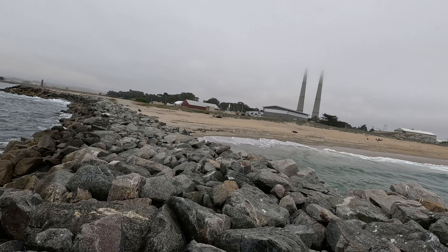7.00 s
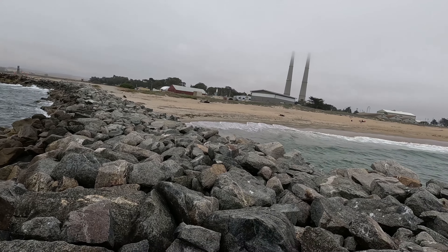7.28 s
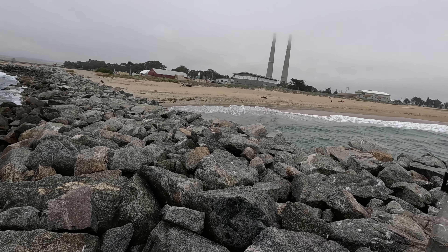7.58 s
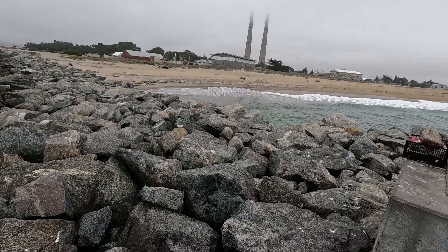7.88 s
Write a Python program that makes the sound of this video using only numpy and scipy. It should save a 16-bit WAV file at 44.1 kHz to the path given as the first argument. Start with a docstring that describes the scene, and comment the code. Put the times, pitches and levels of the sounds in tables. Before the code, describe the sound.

Surf washes over a rock jetty while wind rumbles and thumps on the microphone. A close foghorn sounds a loud, steady, slightly buzzy tone for two seconds, pauses for two, then repeats it on the same pitch. The tone flutters roughly at times. The sea drops back under each blast and swells up again afterwards, with a bigger wave at the end.

```python
"""Foghorn on a rock jetty

Two close 2 s blasts: a driven diaphragm starts flat and catches its pitch; the flare rings.
The tone is heard fluttering and stuttering at times.
Surf washes the rocks and roars in their gaps; wind eddies rumble and thump on the microphone.
Gain control pushes the sea down under each blast and lets it swell back afterwards."""
import sys
import numpy as np
from scipy import signal
from scipy.fft import rfft, irfft, next_fast_len
from scipy.io import wavfile
from scipy.ndimage import uniform_filter1d

SR = 44100
rng = np.random.default_rng(int(sys.argv[2]) if len(sys.argv) > 2 else 0)


def unload_wav(signal):
    """Save mono or channel-first audio to the path in sys.argv[1] as 16-bit WAV at rate SR, clipped to [-1, 1]."""
    wavfile.write(
        sys.argv[1],
        SR,
        np.round(np.clip(np.atleast_2d(signal).T, -1, 1) * 32767).astype(np.int16),
    )


N = 354123
TIME = np.arange(N) / SR
HORN_HZ = 406.8

# wind spectrum: f/Hz, gain/dB
WIND_SPECTRUM = [(5, -24.5), (16, -2), (45, 2), (70, -1), (110, -3.5), (180, -8.5), (260, -18.5),
                 (420, -27.5), (800, -39), (2000, -81), (6000, -125)]
# gusts: peak t/s, length/s, level/dB
WIND_GUSTS = [(.15, 0.97, -29), (.85, 2.3, -22.5), (1.55, 0.23, -38), (1.78, 0.48, -16), (2.3, 1.6, -23.5),
              (3.3, 2.1, -28), (4.28, 0.37, -36), (4.5, 0.18, -31.5), (4.81, 0.2, -24), (5.03, 0.46, -23),
              (5.77, 0.37, -24), (6.5, 0.26, -28.5), (7.12, 0.79, -17), (7.6, 0.7, -16), (7.97, 0.42, -24)]
# buffet rumble spectrum: f/Hz, gain/dB
BUFFET_SPECTRUM = [(30, -5), (90, -4), (150, 2.5), (230, -4), (350, -6.5), (600, -27), (1500, -56.5),
                   (5000, -120)]
# large eddies: peak t/s, length/s, rumble/dB, push/dB
WIND_BUFFETS = [(0.266, 0.046, -19.5, -21), (0.734, 0.05, -19.5, -22), (0.833, 0.026, -23.5, -10),
                (1.006, 0.017, -20, -16), (1.049, 0.013, -17.5, -16), (1.131, .018, -20.5, -15),
                (1.158, .014, -19, -20), (1.239, .06, -23, -20), (1.306, 0.022, -22, -16),
                (1.708, .096, -17.5, -19), (1.863, .059, -17, -18), (1.994, .04, -17, -14),
                (2.389, 0.04, -15.5, -27), (4.81, 0.05, -38, -8.5), (4.982, .035, -33, -13),
                (5.025, 0.052, -31, -16), (5.085, 0.022, -28, -22), (5.598, 0.029, -25, -28),
                (7.049, .087, -21, -18), (7.237, 0.037, -17.5, -11), (7.573, .03, -13.5, -20)]
# calm sea spectrum: f/Hz, gain/dB
SURF_SPECTRUM = [(60, -8), (200, -1), (420, -3.5), (700, -3.5), (1000, -7), (1400, -10), (2000, -14.5),
                 (2600, -18), (3500, -20.5), (4200, -25.5), (5600, -31.5), (7500, -33.5), (9000, -44),
                 (11000, -52), (14000, -70)]
# swells of the wash and its low rumble: peak t/s, length/s, swell/dB, rumble change/dB
SURF_SWELLS = [(0.704, 2.36, 4.5, -5.5), (1.42, 0.42, 2, -14), (1.898, 1.04, 3.5, -1),
               (3.75, 0.3, 2.5, 1.5), (4.34, 0.47, 1.2, 1.5), (4.857, 1.85, 0.8, -7.5),
               (5.38, 0.68, 0.5, 4), (6.099, 1.8, 0.5, 12), (6.9, 1.4, 5.5, 4), (7.768, 1.53, 9, 4)]
# foam on the rocks: peak t/s, length/s, extra treble/dB
FOAM_SPLASHES = [(.1, 0.74, 3), (0.817, 0.21, 1.5), (1.397, 0.42, 5), (2.203, .25, 5), (2.85, 1.9, 3.5),
                 (4.684, 0.67, 1), (5.3, 0.74, 0), (6.3, 0.6, 2.5), (6.756, .36, 3), (7.249, 0.46, 1.5)]
# water roaring in rock gaps: peak t/s, length/s, centre f/Hz, boost/dB
GAP_ROARS = [(3.947, .4, 700, 3.5), (4.5, 1, 600, 2), (4.92, .3, 680, 3), (5.19, .14, 860, 6),
             (5.4, 0.25, 850, 3), (5.95, .6, 600, 2)]
# high hiss spectrum: f/Hz, gain/dB
HISS_SPECTRUM = [(7000, -38.5), (10000, 3), (12700, -0.5), (15000, -1.5), (16000, -16.5)]
# high hiss envelope: t/s, level/dB
HISS_ENVELOPE = [(6.0, -94), (6.3, -74.5), (6.75, -66.5), (7.4, -69), (7.6, -87.5), (7.9, -95.5)]
# flutter band at the fundamental: f/Hz, gain/dB
LOW_FLUTTER_SPECTRUM = [(250, -59), (310, -19), (335, 3.5), (365, 1), (405, 0.5), (450, -5.5), (505, -8.5),
                        (560, -26.5), (680, -68), (3000, -120)]
# flutter band at the octave: f/Hz, gain/dB
OCTAVE_FLUTTER_SPECTRUM = [(620, -48.5), (720, -9.5), (790, 3.5), (835, 4), (880, -10), (930, -31),
                           (1000, -61.5), (3000, -120)]
# stronger flutter: peak t/s, length/s, level at fundamental/dB, level at octave/dB
FLUTTER_SPELLS = [(1.784, 0.75, -22, -29), (2.274, 0.21, -24, -46), (3.478, 0.56, -20, -36.5),
                  (3.627, 0.047, -12.5, -15), (6.982, 0.17, -19, -44), (7.31, 0.087, -18.5, -37),
                  (7.544, 0.26, -14, -20.5), (7.643, 0.17, -11, -18.5), (7.843, 0.52, -25.5, -47.5)]
# flare ringing as the note catches or cuts out: t/s, level/dB
FLARE_ONSETS = [(1.627, -24), (3.628, -29), (5.628, -30.5)]
# brief dips and swells heard in the tone: t/s, length/s, harmonic, offset/Hz, strength (<0 dip)
TONE_STUTTERS = [(1.633, 0.012, 2, -66.5, -1.5), (1.643, 0.023, 1, -30, -1.5), (1.662, 0.053, 1, 6, .5),
                 (1.745, 0.046, 4, 18, -1), (1.876, 0.03, 2, 40, -0.4), (1.925, 0.035, 2, 27, -0.33),
                 (2.49, 0.035, 2, 42, -0.3), (3.228, .03, 2, 48, 0.16), (3.337, 0.033, 1, -26, -0.34),
                 (3.371, .028, 2, 50, -0.3), (3.425, 0.042, 1, 47, 0.2), (3.486, 0.036, 2, 52, -.38),
                 (3.523, 0.046, 2, 58, 0.26), (3.611, 0.012, 2, -62, -0.6), (3.627, 0.051, 1, 35, 0.8),
                 (5.627, 0.061, 1, -14, 0.33), (5.634, 0.013, 2, -48, -1), (5.642, 0.033, 1, -34, -0.9),
                 (1.88, .03, 4, -40, 0.3), (1.94, .035, 4, -40, 0.4), (2.11, .04, 10, -25, -1),
                 (2.865, .035, 10, -25, -.9), (2.92, .035, 10, -25, -2), (3.632, .05, 4, -10, 3),
                 (6.09, 0.051, 4, -18, -1.8), (6.25, .035, 4, -18, 0.3), (7.387, 0.037, 1, 65, 0.6),
                 (7.451, 0.064, 1, -47, 1.36), (7.456, 0.037, 2, -55, -0.7), (7.488, .04, 2, -45, 0.16),
                 (7.513, 0.02, 1, 55, 0.7), (7.536, 0.066, 1, -48, 1.54), (7.615, 0.026, 1, -22, 0.7),
                 (7.574, 0.04, 2, -47, .25), (7.625, 0.044, 1, -51, 0), (7.639, 0.061, 2, -30, 2.5),
                 (7.645, 0.041, 1, -48, 1.2)]
# blasts: start/s, end/s, low overtone slope/(dB/s), high overtone slope/(dB/s), steady flutter/dB
HORN_BLASTS = [(1.603, 3.619, -2.5, -3, -25), (5.604, 7.612, -0.5, -0.5, -44)]
# main partials, blast 1: t/s, fundamental/dB, octave/dB, double octave/dB
FIRST_PARTIALS = [(1.8, -9, -5.5, -28), (2.08, -16, -5, -30), (2.3, -12.5, -5, -28), (2.62, -8.5, -7, -32),
                  (3.25, -10.5, -5, -36.5), (3.55, -9, -5, -32)]
# main partials, blast 2: t/s, fundamental/dB, octave/dB, double octave/dB
SECOND_PARTIALS = [(5.7, -3, -4, -32), (6.12, -7, -4.5, -31.5), (6.6, -5, -6, -32.5),
                   (7.15, -5.5, -7.5, -41.5), (7.56, -8, -6, -54)]
# buzz at mid-blast: harmonic, level in blast 1/dB, level in blast 2/dB
BUZZ_OVERTONES = [(3, -33.5, -36.5), (5, -41, -49), (6, -47.5, -62.5), (7, -58, -65), (8, -52.5, -48.5),
                  (9, -48.5, -45), (10, -43.5, -50.5), (11, -55.5, -59.5), (12, -58, -66.5), (13, -60, -64),
                  (14, -63.5, -67)]
# overtones swelling or fading in moving air: peak t/s, length/s, harmonic, change/dB
AIR_FADES = [(1.85, .8, 3, 1.5), (2.95, 0.96, 3, -2), (3.42, .4, 3, 0.5), (5.75, 0.46, 3, 1.5),
             (2.35, .4, 5, 2), (2.92, .7, 5, -2.5), (3.55, .5, 5, 3), (5.78, .5, 5, 5), (6.7, 1.3, 5, -2),
             (7.58, .24, 5, 15.5), (1.68, .5, 6, -4.5), (2.872, .3, 6, 0), (3.475, .55, 6, 5),
             (1.78, 0.67, 8, 5.5), (2.25, .3, 8, 4), (2.56, .3, 8, -15), (3.13, 0.32, 8, -7),
             (6.402, 1.5, 8, 3.5), (1.9, .3, 9, -13), (2.17, .35, 9, 5), (2.403, 0.12, 9, -11),
             (2.622, 0.2, 9, -12), (2.921, 0.49, 9, 7.5), (3.2, 0.38, 9, 4), (3.55, .18, 9, -9),
             (3.625, .06, 9, 11), (6.453, .7, 9, 0.5), (6.888, 0.81, 9, -12), (7.4, .5, 9, 4),
             (1.618, 0.59, 10, -6), (2.12, .7, 10, 2), (3.1, 0.52, 10, 3.5), (3.45, .25, 10, -1.5),
             (5.72, .5, 10, -4), (6.4, 0.38, 10, 1), (6.79, .32, 10, -10), (7.22, 0.97, 10, 5.5),
             (2.02, 0.28, 11, 4), (2.3, 0.27, 11, 2.5), (2.95, .4, 11, -7), (3.46, 0.59, 11, 9.5),
             (6.82, .3, 11, -7), (7.4, .5, 11, 11), (2.2, .8, 12, -5), (3.202, 1.1, 12, 6)]


def gain(db):
    """Decibels to amplitude."""
    return 10 ** (np.asarray(db) / 20)


def unit_rms(x):
    """Scale to rms 1."""
    return x / np.sqrt(np.mean(x ** 2) + 1e-20)


def curves(rows):
    """Table columns interpolated over time."""
    times_s, *columns = np.transpose(rows)
    return [np.interp(TIME, times_s, column) for column in columns]


def spectrum_gain(spectrum, hz):
    """Amplitude at hz, interpolated in dB over log frequency."""
    points_hz, db = np.transpose(spectrum)
    return gain(np.interp(np.log(hz + 1), np.log(points_hz + 1), db))


def noise(spectrum):
    """Shaped noise, rms 1."""
    size = next_fast_len(N)
    shaped = rfft(rng.standard_normal(size)) * spectrum_gain(spectrum, np.fft.rfftfreq(size, 1 / SR))
    return unit_rms(irfft(shaped, size)[:N])


def drift(top_hz):
    """Random wobble, rms about 1."""
    t, rates_hz = TIME[::100], np.geomspace(top_hz / 8, top_hz, 24)[:, None]
    sines = np.sin(2 * np.pi * (rates_hz * t + rng.random(rates_hz.shape))) / np.sqrt(rates_hz)
    return np.interp(TIME, t, unit_rms(sines.sum(0)))


def hump(peak_s, length_s):
    """Raised cosine, 0 to 1 and back."""
    out = np.zeros(N)
    on = slice(*np.searchsorted(TIME, [peak_s - length_s / 2, peak_s + length_s / 2]))
    out[on] = np.cos(np.pi * (TIME[on] - peak_s) / length_s) ** 2
    return out


def surges(rows, floor_db):
    """Amplitude of humps (t/s, length/s, level/dB) added in power to a floor."""
    return np.sqrt(gain(floor_db) ** 2 + sum(gain(db) ** 2 * hump(t, span) for t, span, db in rows))


def lag(x, t60_s):
    """One-pole build-up and decay."""
    pole = np.exp(-np.log(1000) / (t60_s * SR))
    return signal.lfilter([1 - pole], [1, -pole], x + 1e-18)


def wind(breeze_db=-34, lumpy_db=0.5):
    """Eddies at the microphone: lumpy rumble, gusts over a light breeze."""
    return surges(WIND_GUSTS, breeze_db) * unit_rms(noise(WIND_SPECTRUM) * gain(lumpy_db * drift(24)))


def buffets(push_share=0.22):
    """Large eddies thump: a quick pressure push inside a burst of rumble."""
    bursts = sum(gain(db) * hump(t, span) for t, span, db, _ in WIND_BUFFETS)
    pushes = sum(gain(db) * hump(t, span * push_share) for t, span, _, db in WIND_BUFFETS)
    return bursts * noise(BUFFET_SPECTRUM) + pushes


def surf(calm_db=-33, patchy_db=1.19, flicker_db=0.41, foam_hz=(1800, 7000), bass_hz=330, gap_oct=0.45):
    """Breaking water: patchy wash, bright foam, hollow rock gaps; low rumble, strongest in blast 2."""
    size, hop = 1024, 256
    frames, hz = N // hop + 5, np.fft.rfftfreq(size, 1 / SR)
    at = np.minimum(np.arange(frames) * hop, N - 1)[:, None]
    bass = 1 / (1 + (hz / bass_hz) ** 4)
    treble = np.clip(np.log((hz + 1) / foam_hz[0]) / np.log(foam_hz[1] / foam_hz[0]), 0, 1.2)
    swells_db = sum(hump(t, span)[at] * (db + rumble * bass) for t, span, db, rumble in SURF_SWELLS)
    foam_db = treble * (0.06 + sum(db * hump(t, span)[at] for t, span, db in FOAM_SPLASHES))
    gaps_db = sum(db * hump(t, span)[at] * np.exp(-(np.log2((hz + 1) / centre_hz) / gap_oct) ** 2)
                  for t, span, centre_hz, db in GAP_ROARS)
    real, imag, patches = rng.standard_normal((3, frames, len(hz)))
    patches = unit_rms(uniform_filter1d(uniform_filter1d(patches, 12, axis=0), 12, axis=1))
    random_db = patchy_db * patches + flicker_db * drift(25)[at]
    still = (real + 1j * imag) * spectrum_gain(SURF_SPECTRUM, hz)
    moving = still * gain(swells_db + foam_db + gaps_db + random_db)
    calm, wash = (signal.istft(z.T, nperseg=size, noverlap=size - hop)[1][:N] for z in (still, moving))
    return gain(calm_db) * wash / calm.std()


def hiss():
    """Faint top-treble hiss, rising during the second blast."""
    return gain(curves(HISS_ENVELOPE)[0]) * noise(HISS_SPECTRUM)


def by_blast(first, second):
    """Switch values midway through the pause between blasts."""
    return np.where(TIME < (HORN_BLASTS[0][1] + HORN_BLASTS[1][0]) / 2, first, second)


def pressure(rise_s=0.033, fall_s=0.027):
    """Horn drive: builds smoothly to 1 in a blast, 0 between."""
    return sum(np.sin(np.pi / 2 * np.clip((TIME - start_s) / rise_s, 0, 1)) ** 2
               * np.clip((end_s - TIME) / fall_s + 0.5, 0, 1) for start_s, end_s, *_ in HORN_BLASTS)


def flutter(first_octave_db=-33, onset_s=0.021):
    """Rough bands heard around fundamental and octave, mainly in blast 1 and late in blast 2."""
    low_steady = pressure() * gain(by_blast(*(blast[-1] for blast in HORN_BLASTS)))
    octave_steady = pressure() * by_blast(gain(first_octave_db), 0)
    low_spells = surges([(t, span, db) for t, span, db, _ in FLUTTER_SPELLS], floor_db=-68)
    octave_spells = surges([(t, span, db) for t, span, _, db in FLUTTER_SPELLS], floor_db=-71)
    low = np.hypot(low_steady, low_spells) * noise(LOW_FLUTTER_SPECTRUM)
    octave = np.hypot(octave_steady, octave_spells) * noise(OCTAVE_FLUTTER_SPECTRUM)
    return np.clip((TIME - HORN_BLASTS[0][0]) / onset_s, 0, 1) * (low + octave)


def flare(ring_hz=1190, rise_s=0.017, t60_s=0.26):
    """One flare resonance, rung as the drive starts or stops."""
    out = np.zeros(N)
    for onset_s, db in FLARE_ONSETS:
        age_s = np.maximum(TIME - onset_s, 0)
        envelope = np.minimum(age_s / rise_s, 1) * gain(db - 60 * age_s / t60_s)
        out += envelope * np.sin(2 * np.pi * ring_hz * age_s)
    return np.sqrt(2) * out


def stutter(k):
    """Brief dips and swells heard in harmonic k: complex gain of short, offset side tones."""
    out = np.ones(N, complex)
    for peak_s, length_s, harmonic, offset_hz, strength in TONE_STUTTERS:
        if harmonic == k:
            on = abs(TIME - peak_s) < length_s / 2
            t = TIME[on] - peak_s
            out[on] += strength * np.cos(np.pi * t / length_s) ** 2 * np.exp(2j * np.pi * offset_hz * t)
    return out


def air_fading_db(k):
    """Moving air fades harmonic k on its own; shorter waves shimmer more."""
    shimmer_db = np.sqrt(k / 8) * (0.4 * drift(3) + drift(30))
    return shimmer_db + sum(db * hump(t, span) for t, span, harmonic, db in AIR_FADES if harmonic == k)


def horn(start_flat=0.078, stop_sag=0.02, settle_s=0.024, stop_s=0.01, overshoot_db=10, rasp=0.35):
    """A diaphragm starts flat, catches its pitch, then sags and rings on as the drive stops."""
    start_s, end_s, low_slope, high_slope, _ = (by_blast(*column) for column in zip(*HORN_BLASTS))
    age_s = TIME - start_s
    starting = np.exp(-(age_s / settle_s) ** 4)
    stopping = np.exp(-((end_s - TIME) / stop_s) ** 2)
    slip_turns = -HORN_HZ * np.cumsum(start_flat * starting + stop_sag * stopping) / SR
    drive = pressure() * (1 + rasp * (starting + stopping) * drift(300))

    def partial(k, db, ring_share, t60_s, skip_turns=0):
        """Harmonic k: direct tone plus the share lingering in the horn and among the rocks."""
        direct = drive * np.exp(2j * np.pi * k * slip_turns)
        tone = ((1 - ring_share) * direct + ring_share * lag(direct, t60_s)) * stutter(round(k))
        turns = k * HORN_HZ * TIME + 0.005 * np.sqrt(k) * drift(7.3)
        turns += skip_turns * np.tanh(16 * drift(4))  # abrupt phase skips
        turns += k * k / (2 * np.pi)  # flare dispersion smooths the pulses
        return np.sqrt(2) * gain(db) * (tone * np.exp(2j * np.pi * turns)).real

    fundamental_db, octave_db, double_db = curves(list(FIRST_PARTIALS) + list(SECOND_PARTIALS))
    fundamental_db += overshoot_db * np.exp(-np.abs(age_s) / 0.06)  # as the horn fills
    out = partial(1, fundamental_db, ring_share=0.66, t60_s=0.65)
    out += partial(2.0004, octave_db, ring_share=0.19, t60_s=0.36)
    double_db += 0.48 * drift(30) - 5 * starting
    out += partial(4, double_db, ring_share=0.088, t60_s=0.3, skip_turns=0.05)
    from_middle_s = np.clip(TIME, start_s, end_s) - (start_s + end_s) / 2
    for (k, *levels_db), height in zip(BUZZ_OVERTONES, np.linspace(0, 1, len(BUZZ_OVERTONES))):
        thinning_db = (low_slope + height * (high_slope - low_slope)) * from_middle_s
        buzz_db = by_blast(*levels_db) + thinning_db + air_fading_db(k)
        buzz_db -= 7 * starting  # overtones speak once the pitch locks
        out += partial(k, buzz_db, ring_share=0.37, t60_s=0.52, skip_turns=0.1)
    return out


def scene():
    """Horn, sea and wind, mono."""
    return (horn() + flare() + flutter() + surf() + hiss() + wind() + buffets())[None]


def record(dry, threshold_db=-26, squeeze=0.54, recovery_db_per_s=11, attack_s=0.051, lowpass_hz=15700):
    """Gain control that ignores rumble, clamps fast and recovers slowly; then a band limit."""
    sensed = signal.sosfilt(signal.butter(2, 300, "high", fs=SR, output="sos"), dry[0])
    power_db = 10 * np.log10(abs(uniform_filter1d(sensed ** 2, size=325)) + 1e-12)
    target_cut_db = np.maximum(power_db - threshold_db, 0) * squeeze
    recovery_db = TIME * recovery_db_per_s
    held_cut_db = np.maximum.accumulate(target_cut_db + recovery_db) - recovery_db
    cut_db = lag(held_cut_db, attack_s)
    lowpass = signal.firwin(511, lowpass_hz, window=("kaiser", 9), fs=SR)
    return signal.oaconvolve(dry / gain(cut_db), lowpass[None], "same")


dry = scene()
out = record(dry)
unload_wav(out)
```